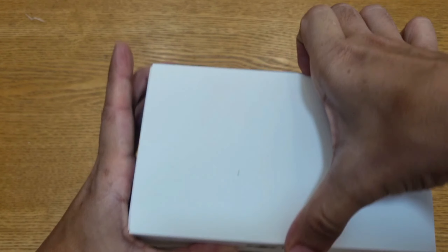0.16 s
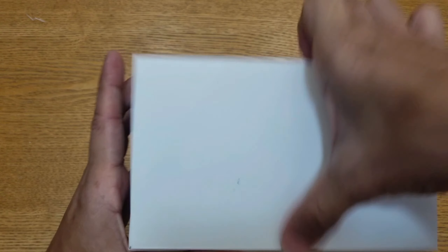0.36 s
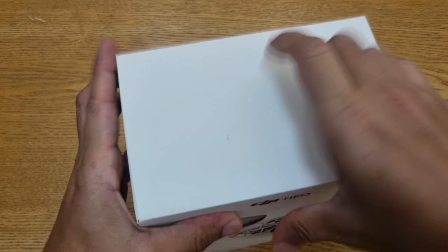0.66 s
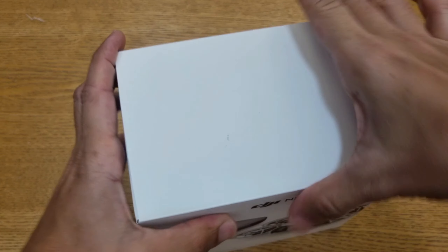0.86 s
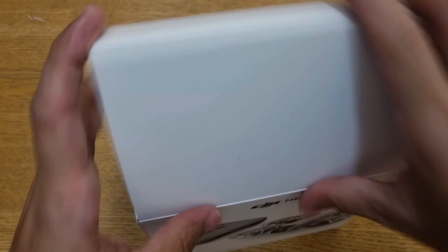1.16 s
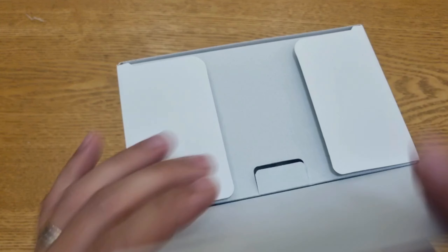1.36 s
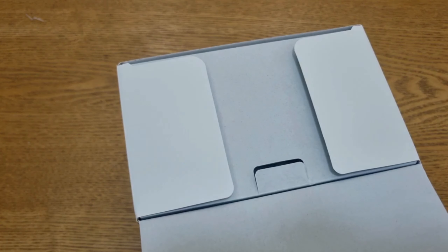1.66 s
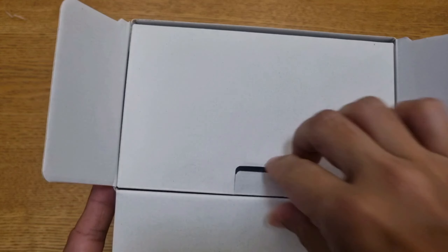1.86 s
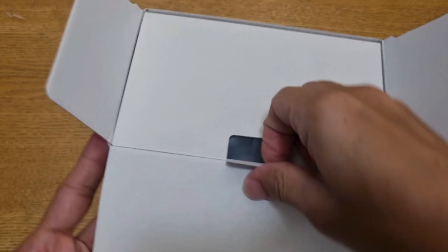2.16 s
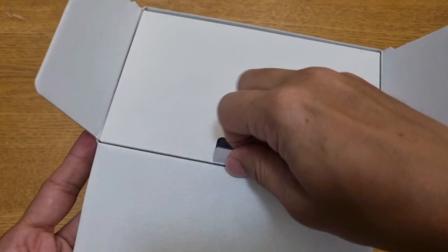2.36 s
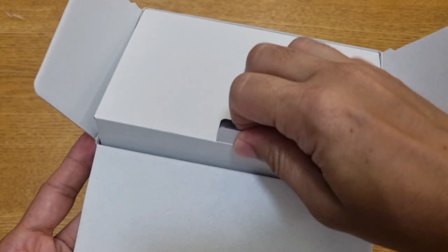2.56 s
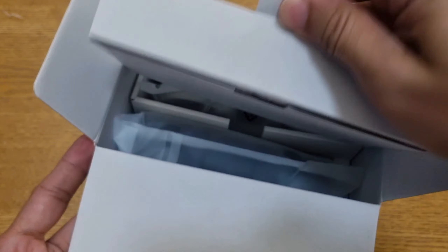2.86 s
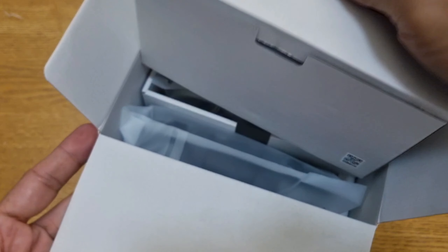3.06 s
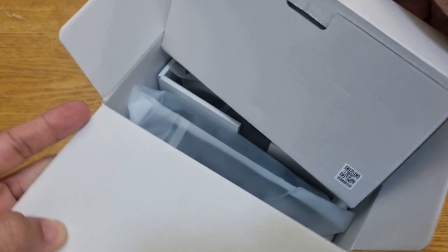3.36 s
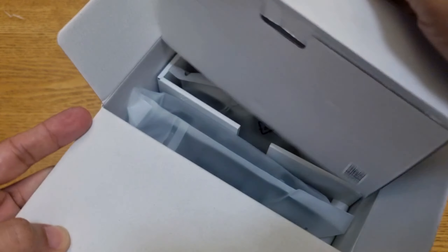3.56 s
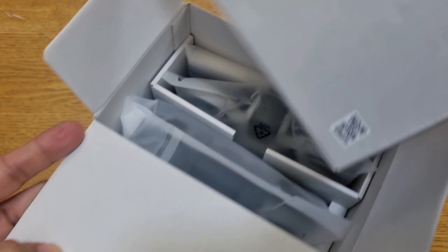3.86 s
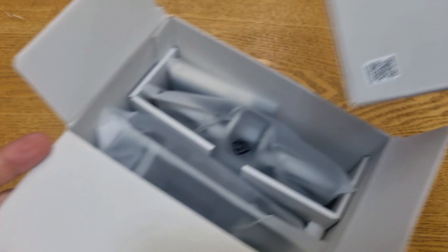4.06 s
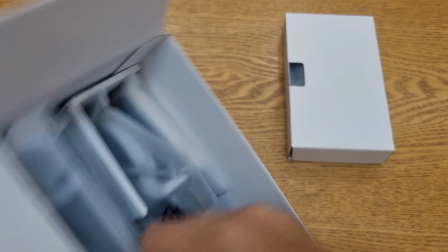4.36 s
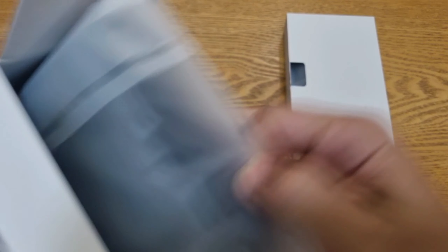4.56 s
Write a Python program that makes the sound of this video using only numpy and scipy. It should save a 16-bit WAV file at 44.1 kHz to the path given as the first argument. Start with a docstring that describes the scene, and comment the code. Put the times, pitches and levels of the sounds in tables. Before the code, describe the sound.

Heard very close in a quiet room, hands handle a small stiff card box on a wooden table. After a faint start comes a tight burst of loud hollow knocks, snaps and scraping, then a short scrape as the lid flap opens. Quiet brushing and small ticks follow, then soft sliding of an inner box, one distinct knock, a low table shudder, and finally louder crisp rustling with bumps.

```python
"""Opening a small cardboard box

Hands open a small cardboard box on a wooden table, heard close by in a quiet room.
Fingers and flaps rub the card: granular friction noise, coloured by the air resonances of the hollow.
Squeezes make the low modes hum, and jolts shake the lowest mode of the table as narrow-band noise.
Knocks and snaps are short contacts that set decaying modes ringing; steady room noise lies beneath.
"""
import sys
import numpy as np
from scipy import signal
from scipy.fft import rfft, irfft, next_fast_len
from scipy.io import wavfile
from scipy.ndimage import uniform_filter1d

SR = 44100
rng = np.random.default_rng(int(sys.argv[2]) if len(sys.argv) > 2 else 0)


def output_pcm(signal):
    """Save a mono or channel-first signal as 16-bit PCM at the path in sys.argv[1].

    Samples are clipped to [-1, 1] before scaling.
    """
    pcm = np.clip(np.atleast_2d(signal).T, -1, 1) * 32767
    wavfile.write(sys.argv[1], SR, np.round(pcm).astype(np.int16))


N = 207643

# low modes of box and table: (frequency [Hz], relative level [dB], free 60 dB decay time [s])
LOW_MODES = [(52.5, -20, 0.14), (112.5, -4.5, 0.17), (139.4, -13, 0.51), (188.4, 3, 0.14), (264.2, 7, 0.15),
             (311, 9, 0.11)]


def gain_of(db):
    """Level law: 20 dB is a factor of ten in amplitude."""
    return 10 ** (np.asarray(db) / 20)


def evened(x):
    """Normalisation to an rms of 1."""
    return x / np.sqrt(np.mean(x ** 2) + 1e-20)


def peaked(x):
    """Normalisation to a peak of 1 in the centre row."""
    return x / (abs(x[0]).max() + 1e-12)


def read(points, hz):
    """A spectrum of (Hz, dB) points, interpolated in dB over log frequency."""
    f, db = np.transpose(points)
    return np.interp(np.log(hz + 1), np.log(f + 1), db)


def coloured(x, points):
    """Linear filtering: the spectrum of x is multiplied by a gain curve."""
    size = next_fast_len(x.shape[-1])
    gain = gain_of(read(points, np.fft.rfftfreq(size, 1 / SR)))
    return irfft(rfft(x, size) * gain, size)[..., :x.shape[-1]]


def resonate(x, hz, width):
    """A damped oscillator: a two-pole resonance of about unit gain, its bandwidth set by the damping."""
    r = np.exp(-np.pi * width / SR)
    return signal.lfilter([1 - r, 0, r - 1], [1, -2 * r * np.cos(2 * np.pi * hz / SR), r * r], x)


def steadied(x, seconds):
    """Level compression: evens out the slow swells of a narrow noise, so that the hand sets its level."""
    power = abs(uniform_filter1d(x ** 2, round(seconds * SR), axis=-1))
    return x / np.sqrt(power + 0.33 * np.mean(x ** 2))


def nearness_db(hz, near_hz, octaves):
    """Selective excitation: modes near the pitch of the touched spot answer most."""
    return -6 * (np.log2(hz / near_hz) / octaves) ** 2


def grit(per_s, spread_db, grain_ms, smooth):
    """Stick-slip friction: noise in uneven grains as fibres catch and let go; rows: centre, sides."""
    caught = rng.random(N) < per_s / SR
    sizes = gain_of(spread_db * np.minimum(rng.exponential(1, N), 4)) * caught
    grain = np.exp(-np.arange(2000) / (grain_ms * SR / 1000))
    envelope = smooth + evened(signal.oaconvolve(sizes, grain)[:N])
    return envelope * rng.standard_normal((2, N))


def played(rows, t, level, controls=(), rest_db=-105., rest=0.):
    """Power summation of overlapping strokes at times t: level in dB, then power-weighted controls."""
    edge_db = 24  # each stroke's rise and fall are the times to and from this far under its peak
    roundness = 1.143  # 1 = pointed, 2 = a rounded top
    columns, grid = np.transpose(rows)[:, :, None], np.arange(0, N / SR + .002, .002)
    off = grid - columns[0]
    rise, fall = np.maximum(columns[1], .004), np.maximum(columns[2], .004)
    spent = np.where(off < 0, -off / rise, off / fall)
    power = gain_of(2 * (columns[level] - edge_db * spent ** roundness))
    idle = gain_of(2 * rest_db)
    total = power.sum(0) + idle
    curves = [10 * np.log10(total)]
    curves += [((power * columns[c]).sum(0) + idle * rest) / total for c in controls]
    return [np.interp(t, grid, c) for c in curves]


def room_tone():
    """Stationary noise: the steady air of the room, random noise with a fixed spectrum."""
    # spectrum of the room: (frequency [Hz], relative density [dB])
    room_spectrum = [(15, 5), (25, 11), (66, 21.5), (212, 30), (489, -5), (695, -39), (1130, -57.5),
                     (3250, -48.5), (4870, -52), (9320, -90), (16000, -50)]
    level_db = -75.5
    return gain_of(level_db) * evened(coloured(rng.standard_normal((2, N)), room_spectrum))


def rubbing():
    """Friction and cavity resonance: skin and card drag over card, lifted where the hollow resonates."""
    # strokes: (peak [s], rise [s], fall [s], paper hiss [dB], card scrape [dB],
    # share that rings the hollow [0-1], hiss tilt [dB per octave], scrape tilt [dB per octave])
    strokes = [(0.0, .02, .1, -60, -56, .05, 4, -1), (0.162, 0.055, 0.16, -69.5, -66.5, 0.1, 2, 1.5),
               (0.273, 0.17, 0.12, -66.5, -61.5, .02, 4, -2.9),
               (0.355, 0.026, 0.041, -49, -62, .3, -5.5, -2),
               (0.435, 0.087, 0.073, -40, -41.5, 0.14, 0.8, 5.5),
               (0.555, 0.053, 0.045, -50.5, -40.5, 0.47, 7.5, 6),
               (0.597, 0.019, 0.12, -49.5, -46, 0.1, 3, 0), (0.645, 0.075, 0.079, -58.5, -53, 1, 3, 16),
               (0.752, 0.031, 0.095, -58.5, -61, 0.2, 1.5, 5),
               (0.836, 0.021, 0.031, -54.5, -47.5, 0.82, -8, 1.1),
               (0.916, 0.037, 0.068, -68, -67, 0.23, -1.1, -1.9),
               (1.085, 0.07, 0.11, -65.5, -53, 0.82, -6, 5), (1.175, .025, 0.16, -69, -58, 0.36, 3, 2.5),
               (1.261, 0.047, 0.055, -52.5, -42.5, 0.07, 6, -2.3),
               (1.34, 0.27, 0.66, -57.5, -74, .02, 6.5, 5),
               (1.454, 0.029, 0.074, -50, -58, 0.43, 2.5, -2.5),
               (1.589, 0.062, .12, -56.5, -61, 0.52, 4, 14), (1.77, 0.2, 0.17, -60.5, -66.5, 0.6, 1.5, 6),
               (1.878, 0.12, 0.097, -60.5, -59.5, 1, 3, 16), (1.934, 0.32, 0.0062, -72.5, -66.5, 1, 2.2, 0),
               (2.025, 0.037, 0.084, -55, -60, .3, -7, 3), (2.075, 0.053, 0.053, -62.5, -55.5, 0.1, -8, 1),
               (2.159, 0.017, 0.079, -61, -64, .3, -6, 3.5), (2.203, 0.071, 0.058, -71, -50, 0.45, .6, -3),
               (2.262, 0.047, 0.059, -54, -46, 0, .6, -1.5), (2.43, 0.87, 0.22, -62, -60.5, 0.1, 1.5, 3),
               (2.535, 0.056, 0.07, -58.5, -47, 0, 0, -2.1),
               (2.585, 0.051, 0.096, -53.5, -44, 0.28, 3.5, -1), (2.752, 0.21, 0.22, -55, -45, .12, 0.5, 0),
               (2.845, 0.2, 0.066, -51, -51.5, .02, 3, -2.5), (2.885, 0.027, 0.052, -56, -44, 0.1, 3, 0.5),
               (2.984, 0.17, 0.065, -59, -50.5, 0.02, -1, -0.7),
               (3.06, 0.21, 0.29, -69.5, -62.5, 0.28, 1.7, 2), (3.32, 0.26, 0.11, -74, -66, 0, 4, 0),
               (3.4, 0.094, 0.13, -55, -52, 0.2, -1.5, 0.5),
               (3.465, 0.21, 0.023, -55.5, -59.5, 0.1, -4, 4.5),
               (3.585, 0.03, 0.12, -61.5, -52.5, 0.17, -2.8, 5.5),
               (3.63, 0.057, 0.066, -54, -55, 0.15, -1, 5), (3.66, 0.081, 0.03, -53, -50.5, .02, 5, -1),
               (3.775, .25, 0.069, -75, -71, 0, 3.3, 1), (4.139, 0.2, 0.27, -67.5, -72.5, 0.43, -1.1, 3.5),
               (4.29, 0.13, 0.2, -60, -62, .15, -1.5, -0.5), (4.399, 0.17, 0.15, -57.5, -48, 0, -5.5, -1.5),
               (4.465, 0.068, 0.33, -51, -55, 0, 0.5, 11.5), (4.535, 0.19, 0.5, -44.5, -51, 0.1, 3.5, 3.5),
               (4.71, 0.13, .05, -44.5, -36, 0, 6, -3)]
    # air in the box: (frequency [Hz], half-width [Hz], lift at full share [dB])
    air_modes = [(1288, 190, 28.5), (2390, 71, 21), (3220, 53, 17.5), (4290, 200, 10), (5440, 700, 5)]
    # paper hiss before tilt: (frequency [Hz], relative density [dB])
    hiss_spectrum = [(1290, -61), (2200, -2), (2830, 4.5), (3110, 11.5), (3620, 10.5), (4040, 9.5),
                     (5850, 6.5), (7280, 9.5), (9620, -2), (10900, -2), (15200, -4), (16100, -3),
                     (16500, -39)]
    # card scrape before tilt: (frequency [Hz], relative density [dB])
    scrape_spectrum = [(210, 3), (350, -2.5), (493, 8), (681, 11), (1140, 11), (1380, 8), (2020, 8),
                       (2250, 0.5), (3000, -4), (3900, -49), (6600, -120)]
    # a short gap: the rubbing drops by 30 dB between these times
    gap_from_s, gap_to_s, gap_db = 1.941, 1.985, -30

    fine = grit(per_s=280, spread_db=-6.5, grain_ms=15.5, smooth=0.93)
    # edges stick and slip in coarser steps
    catches = grit(per_s=170, spread_db=1.0, grain_ms=4.5, smooth=1.7)
    drives = np.array([fine, fine + 1.07 * catches])
    hz, t, z = signal.stft(drives, SR, nperseg=512, noverlap=384)
    hz = hz[:, None]

    hiss_tilt_db = played(strokes, t, level=3, controls=[6])[1]
    share, scrape_tilt_db = played(strokes, t, level=4, controls=[5, 7])[1:]
    levels_db = [played(strokes, np.arange(N) / SR, level=k)[0] for k in (3, 4)]
    lift = sum(db / (1 + ((hz - f) / w) ** 2) for f, w, db in air_modes)
    hollow = gain_of(np.clip(share, 0, 1) * lift)
    hiss = gain_of(read(hiss_spectrum, hz) + hiss_tilt_db * np.log2((hz + 1) / 6000)) * hollow
    scrape = gain_of(read(scrape_spectrum, hz) + scrape_tilt_db * np.log2((hz + 1) / 1100)) * hollow

    # slowly drifting random unevenness of the spectrum, about 80 ms long, weaker in the treble
    unevenness = uniform_filter1d(rng.standard_normal((len(t), len(hz))), 30, 0)
    unevenness = evened(uniform_filter1d(unevenness, 2, 1)).T
    uneven_gain = gain_of(3.76 * unevenness / np.sqrt(1 + (hz / 8000) ** 2))

    in_gap = (np.arange(N) > gap_from_s * SR) & (np.arange(N) < gap_to_s * SR)
    gap_gain = uniform_filter1d(np.where(in_gap, gain_of(gap_db), 1.), size=180)
    out = np.zeros((2, N))
    for db, colour, drive in zip(levels_db, (hiss, scrape), z):
        colour = colour / np.sqrt((colour ** 2).mean(0)) * uneven_gain
        rub = signal.istft(drive * colour, SR, nperseg=512, noverlap=384)[1][:, :N]
        out += gap_gain * gain_of(db) * evened(rub)
    return out


def grips():
    """Friction-driven modes: hands squeeze and drag the box, its low modes hum over a dull rumble."""
    # squeezes: (peak [s], rise [s], fall [s], hum level [dB], pitch of the wall that is held [Hz])
    squeezes = [(0.0, 0.022, 0.1, -53, 197), (0.16, 0.18, 0.16, -61.5, 237), (0.447, 0.12, 0.15, -40, 205),
                (0.555, 0.026, 0.035, -33, 258), (0.627, 0.15, 0.088, -46.5, 184),
                (0.74, 0.1, 0.18, -54.5, 262), (1.008, 0.19, 0.11, -61, 118), (1.098, 0.13, 0.16, -63, 221),
                (1.277, 0.071, 0.066, -51, 157), (1.902, 0.24, 0.042, -63, 178),
                (2.037, 0.05, 0.14, -60, 298), (2.223, .11, 0.16, -41.5, 109),
                (2.38, 0.13, 0.27, -61.5, 180), (2.576, 0.16, 0.072, -54, 325),
                (2.754, 0.21, .2, -58.5, 288), (2.879, 0.086, 0.059, -46, 179),
                (3.073, 0.16, 0.14, -60, 108), (3.219, .09, 0.14, -59.5, 114),
                (3.344, 0.038, 0.1, -56, 332), (3.666, 0.09, 0.09, -54.5, 264),
                (4.06, 0.051, 0.35, -60.5, 265), (4.12, 0.17, 0.074, -63.5, 262),
                (4.29, 0.097, 0.12, -52.5, 164), (4.404, 0.12, 0.074, -54.5, 328),
                (4.555, .09, 0.14, -46.5, 201), (4.62, 0.14, 0.13, -51, 149),
                (4.685, 0.088, 0.15, -35, 108)]
    # rumble: (frequency [Hz], relative density [dB])
    rumble_spectrum = [(40, -84), (90, 6), (250, -9), (500, -9), (900, -56)]
    hold_db, hold_hz = -68.5, 204  # the hum of the box merely held
    level_db, wall_hz = played(squeezes, np.arange(N) / SR, level=3, controls=[4],
                               rest_db=hold_db, rest=hold_hz)
    drag = grit(per_s=78, spread_db=-3.5, grain_ms=5.6, smooth=1.0)
    hum, weight_power = 0, 0
    for hz, db, t60 in LOW_MODES[1:]:
        weight = gain_of(db + nearness_db(hz, wall_hz, 0.3))
        # wider than the free mode, whose bandwidth is about 2.2 / t60
        hum = hum + weight * steadied(resonate(drag, hz, 3.9 / t60), 0.065)
        weight_power = weight_power + weight ** 2
    rumble = evened(coloured(drag, rumble_spectrum))
    return gain_of(level_db) * (hum / np.sqrt(weight_power) + 0.67 * rumble)


def shudder():
    """Forced vibration: the lowest mode of the table, shaken by the hands, as narrow-band noise."""
    # jolts of the table: (peak [s], rise [s], fall [s], level [dB])
    jolts = [(0.14, .1, 0.34, -67), (0.39, 0.046, .2, -69), (0.545, 0.018, 0.046, -45),
             (0.62, .04, .03, -54), (0.77, 0.052, 0.052, -66), (1.01, 0.11, 0.19, -58.5),
             (1.27, 0.084, 0.11, -47), (1.72, .12, 0.23, -58), (2.03, 0.083, .1, -62.5),
             (2.2, 0.11, .2, -55), (2.36, 0.25, 0.11, -49), (2.78, 0.083, 0.096, -62),
             (2.98, .06, 0.18, -50.5), (3.07, 0.13, 0.063, -47.5), (3.17, .05, 0.034, -49),
             (3.23, .035, 0.033, -46), (3.3, 0.051, .2, -44), (3.42, 0.31, 0.23, -45),
             (3.53, .2, 0.05, -40.5), (3.68, 0.16, 0.12, -43.5), (4.07, 0.13, .15, -55),
             (4.46, 0.12, 0.087, -68), (4.59, 0.055, 0.095, -60)]
    still_db = -88.5  # the table at rest
    shake = resonate(resonate(rng.standard_normal((2, N)), 56.5, 11), 55.3, 10)
    level_db = played(jolts, np.arange(N) / SR, level=3, rest_db=still_db)[0]
    return gain_of(level_db) * steadied(shake, 0.047)


def ring(modes, near_hz, octaves, t, lasting=1):
    """Modal superposition: a struck spot sounds as a sum of decaying sines; lasting scales their decay."""
    out = 0
    for hz, db, t60 in modes:
        level_db = db + nearness_db(hz, near_hz, octaves) - 60 * t / (t60 * lasting)
        out = out + gain_of(level_db) * np.sin(2 * np.pi * hz * t)
    return out


def blows():
    """Impact excitation: a push into the low modes, a rough contact into the panels, a bright snap."""
    # blows: (time [s], panel peak [dB], panel pitch [Hz], thump peak [dB], thump pitch [Hz],
    # thump decay [factor on t60], snap peak [dB], contact [ms])
    hits = [(0.144, -52, 630, -70, 258, 1.6, -70, 8.6), (0.163, -46, 604, -43, 250, 0.41, -60, 1.9),
            (0.354, -53, 1206, -46, 220, 0.8, -45, 7.2), (0.437, -19, 1340, -22.5, 184, 0.8, -24.5, 2.8),
            (0.455, -28, 1626, -18, 161, 0.59, -24, 2.7), (0.48, -55, 501, -31, 145, 0.77, -55, 3.6),
            (0.537, -38, 1260, -16, 148, 0.24, -40.5, 11), (0.553, -17, 1200, -21.5, 334, 0.6, -52, 2.53),
            (0.585, -29, 1266, -27, 168, 1.45, -26, 7), (0.596, -48, 820, -29.5, 181, 1.1, -52, 1.4),
            (0.716, -44, 501, -32, 264, 0.86, -55, 4.7), (0.75, -41, 980, -34, 240, 0.57, -41, 9.3),
            (0.912, -49, 790, -45.5, 310, 0.73, -49.5, 1.8),
            (0.987, -54.5, 1185, -43.5, 80.4, .46, -80, 10), (1.072, -34, 1340, -55, 86, 2.9, -54, 7),
            (1.173, -44.5, 1490, -45.5, 301, 1.3, -54, 7.6), (1.264, -42, 657, -29.5, 81, 0.11, -47, 10.3),
            (1.57, -57.5, 1281, -57, 107, 2.3, -40.5, 6.5),
            (1.601, -56, 1390, -47.5, 168, 0.68, -39.5, 2.7), (1.7, -72, 1297, -46.5, 134, 0.76, -58, 2.8),
            (2.02, -42.5, 1670, -45, 70.4, 0.12, -59, 0.71),
            (2.157, -44.5, 550, -42.5, 92.5, 3.3, -53, 9.9), (2.189, -35.5, 650, -47, 128, 3.4, -57, 24.6),
            (2.252, -38, 526, -35.5, 133, 1.3, -50, 1.3), (2.294, -41, 1370, -59, 113, 0.62, -42.5, 4.6),
            (2.451, -51, 1280, -52, 205, 1.3, -52, 1.7), (2.465, -43, 850, -49, 190, 3.1, -41.5, 5),
            (2.572, -48, 1308, -48, 336, .73, -43, 3.9), (2.764, -31.5, 1125, -65, 110, 1.5, -47, 1.6),
            (2.862, -31.5, 720, -47, 188, 0.38, -47, 4.3), (2.969, -45, 1448, -42.5, 66, 0.38, -50, 8.5),
            (3.341, -22.5, 905, -43.5, 334, .64, -69, 6.3), (3.67, -42, 483, -45.5, 64.5, 1.3, -61, 2.7),
            (3.822, -54.5, 800, -58, 69, 1.15, -80.5, 1.9), (4.206, -46, 516, -50.5, 113.6, 2.2, -48, 5.1),
            (4.256, -42, 750, -53, 160, 1.1, -46.5, 2), (4.272, -54, 490, -41.5, 141, 0.41, -51.5, 27),
            (4.315, -43, 644, -59, 97, 1.2, -42, 2.6), (4.348, -36.5, 686, -64, 109, 0.89, -39.5, 3.3),
            (4.362, -40.5, 1125, -50, 112, 6.5, -44, 2.1), (4.4065, -28, 790, -34, 336, 0.26, -26, 2.1),
            (4.519, -29, 580, -31.5, 347, 0.6, -29, 1.7), (4.556, -41, 937, -33.5, 172, 1.1, -52, 4.4),
            (4.616, -35, 730, -37, 330, 1, -33, 5.3), (4.65, -33, 510, -28.5, 108, .7, -48, 7.3),
            (4.666, -45, 689, -22, 97, 2.2, -41, 4.9), (4.698, -20.5, 750, -45, 111, 1.1, -31, 5.8)]
    # panels: (frequency [Hz], relative level [dB], 60 dB decay time [s])
    panel_modes = [(410, -2, 0.015), (580, 8.5, 0.0074), (826, 3.5, 0.024), (1042, -3.5, 0.056),
                   (1276, 13, 0.012), (1510, 0, 0.025), (1950, 10, 0.019), (2600, 1.5, 0.015),
                   (3200, -1, .015)]
    # snap before its tilt: (frequency [Hz], relative density [dB])
    snap_spectrum = [(1500, -2), (2600, 4), (16000, 0.5)]
    snap_tilt_db = -6  # an octave
    snap_colour = [(hz, db + snap_tilt_db * np.log2(hz / 4000)) for hz, db in snap_spectrum]

    out, t = np.zeros((2, N + 12000)), np.arange(12000) / SR
    early = t[:3000]
    noises = rng.standard_normal((len(hits), 2, 2, 3000))
    leans = 0.59 * rng.standard_normal(len(hits))  # how far each blow sits to one side
    thin, bright = (signal.butter(2, hz, "high", fs=SR, output="sos") for hz in (350, 2400))
    first = -np.exp(-((early - .0003) / .0001) ** 2)  # the pulse of the first touch
    for row, (rough, crisp), lean in zip(hits, noises, leans):
        s, panel_db, panel_hz, thump_db, thump_hz, lasting, snap_db, ms = row
        u = early / (max(ms, .2) / 1000)
        contact = (1 - np.exp(-u / 0.18)) * np.exp(-u ** 2)

        # a deeper thump comes from a slower, softer push
        push = -np.hanning(round(.35 * SR / thump_hz))
        thump = signal.oaconvolve(push, ring(LOW_MODES, thump_hz, 0.57, t, max(lasting, .1)))
        # the wall takes part of a cycle to get moving
        thump = thump[:12000] * (1 - np.exp(-t * thump_hz / 0.086))

        strike = contact * rough * [[1], [.6]] + 0.51 * np.outer([1, lean], first)
        strike = signal.sosfilt(thin, strike)
        panel = signal.oaconvolve(strike, ring(panel_modes, panel_hz, 0.42, t)[None], axes=1)

        crackle = crisp * (contact + 0.027 * np.exp(-early / 0.016))
        snap = coloured(signal.sosfilt(bright, crackle), snap_colour)

        at = round(s * SR)
        out[:, at:at + 12000] += gain_of(thump_db) * peaked(np.outer([1, lean], thump))
        out[:, at:at + 12000] += gain_of(panel_db) * peaked(panel[:, :12000])
        out[:, at:at + 3000] += gain_of(snap_db) * peaked(snap)
    return out[:, :N]


def scene():
    """Spatial coherence: the two microphones agree in the bass and differ in the treble."""
    # stereo width: (frequency [Hz], gain of the sides [dB])
    width = [(60, -28.5), (130, -14.5), (290, -10.5), (640, -9), (1410, -4.5), (3100, -0.5), (6820, 0),
             (15000, 0.5)]
    centre, sides = room_tone() + rubbing() + grips() + shudder() + blows()
    sides = coloured(sides, width)
    return np.array([centre + sides, centre - sides])


def record(dry):
    """Band limiting: the microphones lose the deepest bass, the recorder the treble above its edge."""
    edge_hz = 15850
    lean = signal.sosfilt(signal.butter(3, 42, "high", fs=SR, output="sos"), dry)
    low_pass = signal.firwin(511, edge_hz, window=("kaiser", 9), fs=SR)
    return signal.oaconvolve(lean, low_pass[None], "same")


dry = scene()
out = record(dry)
output_pcm(out)
```